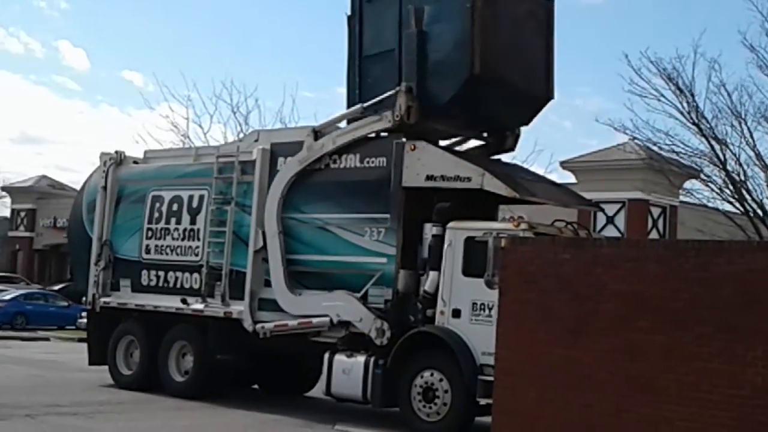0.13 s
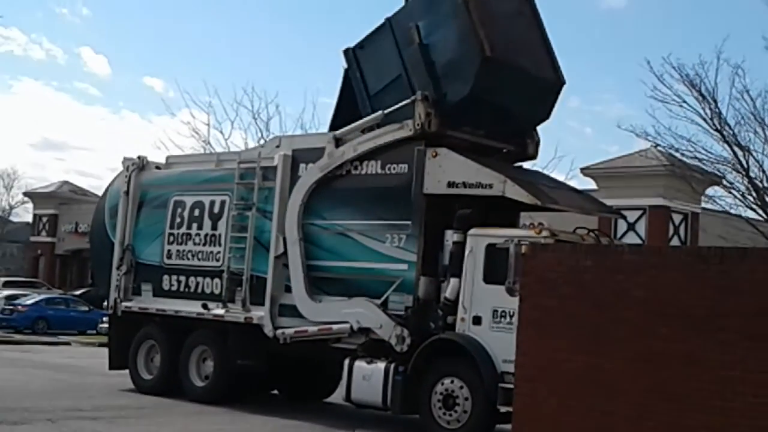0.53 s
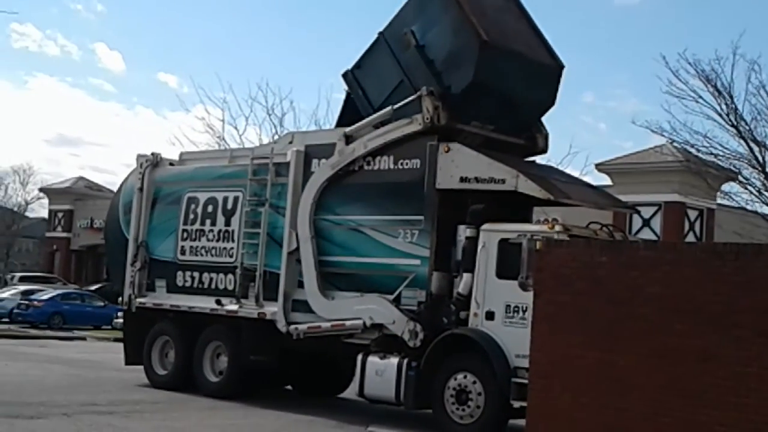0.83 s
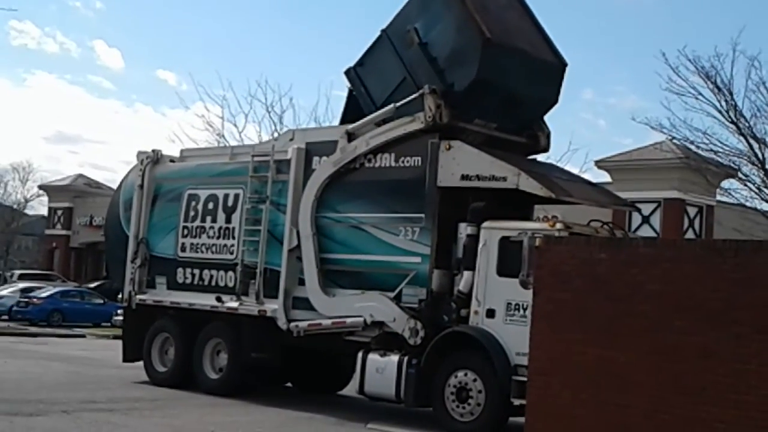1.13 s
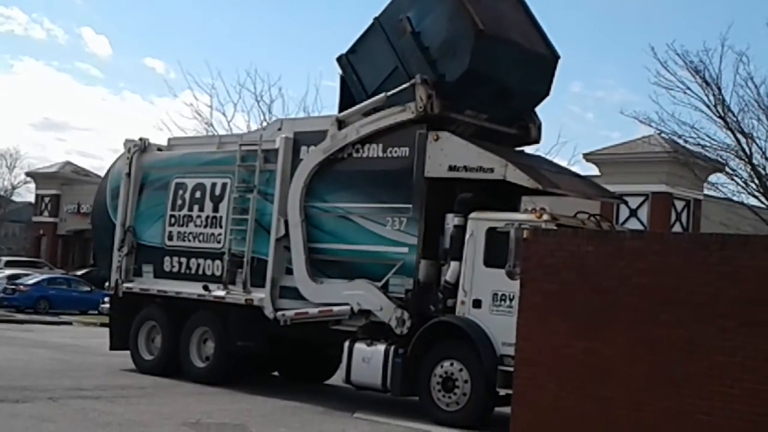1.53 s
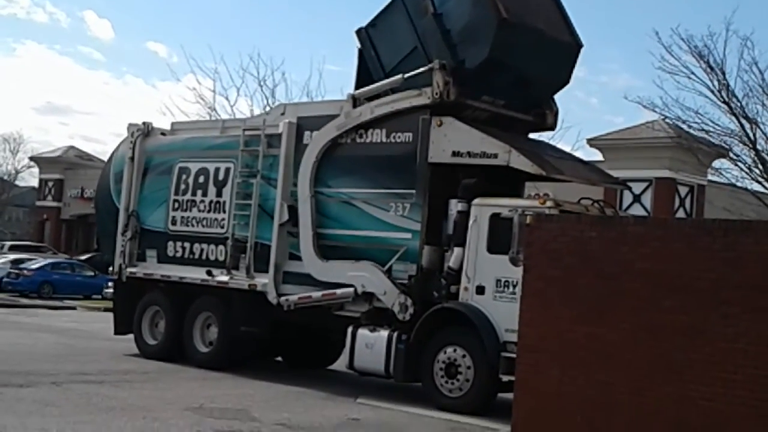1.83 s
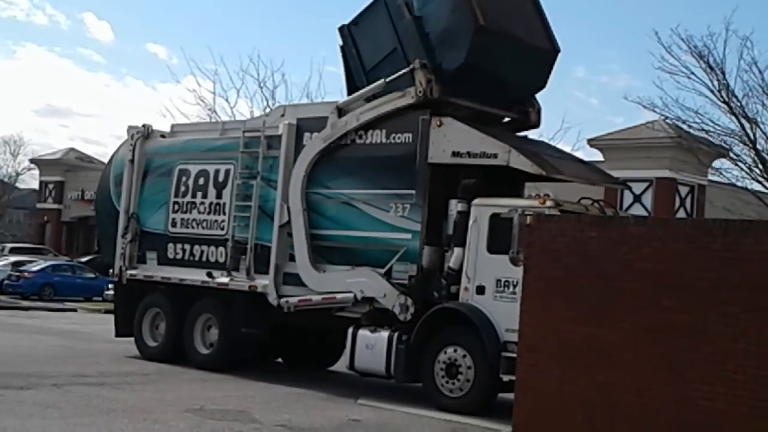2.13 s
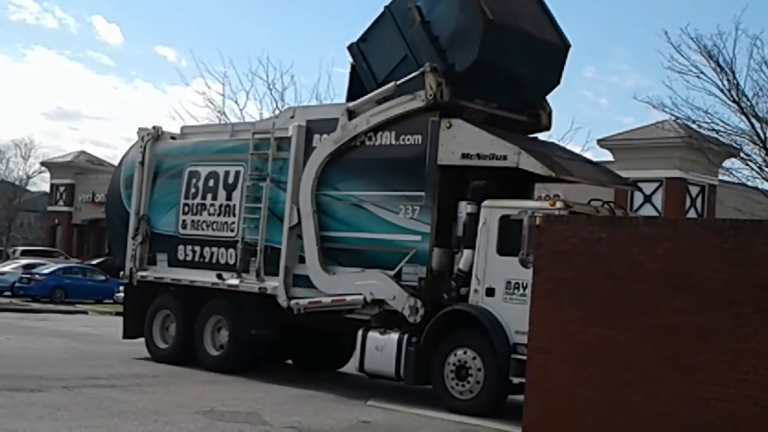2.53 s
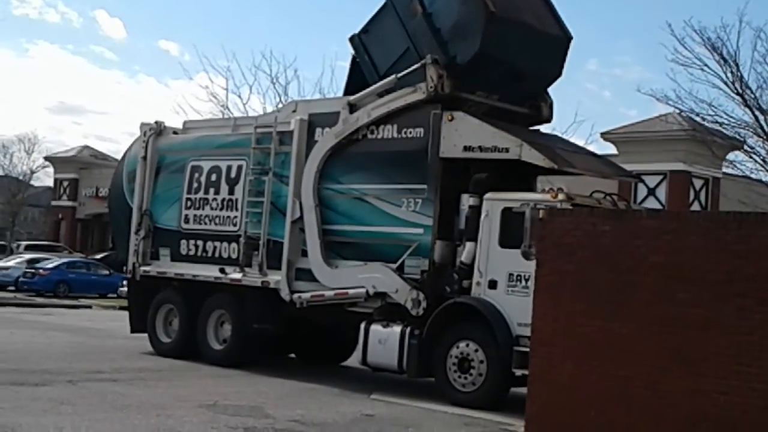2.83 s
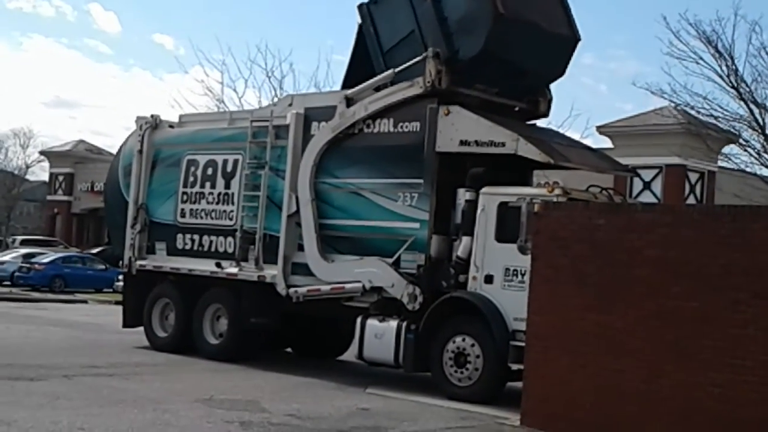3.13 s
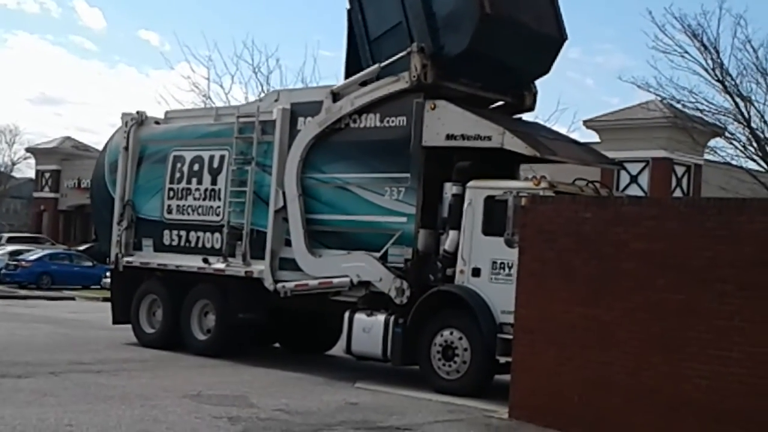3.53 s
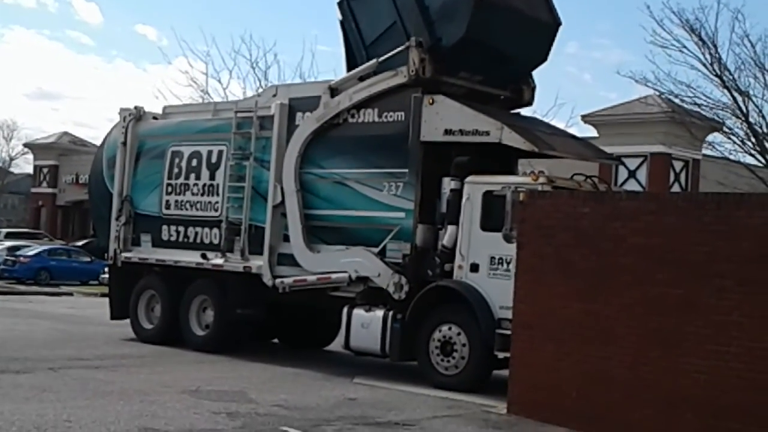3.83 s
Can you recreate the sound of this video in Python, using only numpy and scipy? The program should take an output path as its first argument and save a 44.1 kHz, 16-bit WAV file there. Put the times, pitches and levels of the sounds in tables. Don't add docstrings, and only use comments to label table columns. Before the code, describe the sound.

A big hollow metal container bangs and clatters on a truck's lifting arms, hydraulics humming

```python
import sys
import numpy as np
from scipy import signal
from scipy.fft import rfft, irfft, next_fast_len
from scipy.io import wavfile
from scipy.ndimage import uniform_filter1d, minimum_filter1d

SR = 44100
rng = np.random.default_rng(int(sys.argv[2]) if len(sys.argv) > 2 else 0)


def gain_from_db(level_db):
    decades = np.asarray(level_db, float) / 20
    return 10 ** decades


def transcribe(signal):
    frames = np.atleast_2d(signal).T
    limited = np.clip(frames, -1, 1)
    pcm = np.round(limited * 32767).astype(np.int16)
    wavfile.write(sys.argv[1], SR, pcm)


N = 176400

# (time [s], force [dB], contact hardness [dB])
RATTLES = [
    [(.21, -22, -58), (.3, -20, -56)],
    [(.29, -11, -47), (.37, -19.5, -34), (.48, -15.5, -28.5), (.62, -20, -38), (.8, -27, -48.5),
     (1.0, -32.5, -55), (1.25, -40, -60.5)],
    [(2.25, -22.5, -53), (2.32, -23.5, -58)],
    [(2.31, -16, -39), (2.37, -15.5, -38), (2.44, -14.5, -38), (2.53, -18, -35), (2.62, -16.5, -32.5),
     (2.8, -21.5, -39), (2.97, -28, -52), (3.45, -39.5, -50)],
    [(3.84, -18, -53.5), (3.87, -19, -48.5), (3.92, -18.5, -48.5), (4, -20, -50)],
]
# (time [s], peak [dB], hardness [dB])
SLAMS = [
    (0.204, -28, -14),
    (.288, -1.5, 0.5),
    (2.248, -26, -10),
    (2.308, -4.5, 4),
    (3.836, -16, -8),
    (2.487, -13.5, -14.5),
]
# (frequency [Hz], level [dB per Hz])
BOX_SPECTRUM = [(30, -50), (70, -15), (260, -4), (700, -4), (1600, -17), (3300, -28), (5500, -41.5),
                (11500, -55), (14000, -59)]
# (frequency [Hz], width [Hz], level [dB])
PANELS = [(263.4, 96, 5.5), (338, 52, 6.5), (434, 51, -6), (656, 164, 8), (820, 100, -4), (1007, 80, 2.5),
          (1396, 420, 4.5), (2090, 350, 3.5), (3180, 81, 4), (4400, 2030, 4)]
# (frequency [Hz], t60 [s])
BOX_DECAY = [(60, 0.5), (300, 0.15), (1000, 0.08), (4000, 0.12), (12000, .05)]
# (low edge [Hz], high edge [Hz], share of hardness swing [1], share of smooth sliding [1])
CONTACT_BANDS = [(20, 1300, 0.012, 0.2), (1300, 3500, 0.16, 0.39), (3500, 6500, 0.43, .45),
                 (6500, 16000, 0.88, 0.5)]
CRACK_SHARE = [0.4, .8, 0.6, 1.1]
# (frequency [Hz], level [dB], t60 [s])
BOOMS = [(103, -13, 0.27), (272, -15, 0.13), (344.5, -4.5, 0.69), (678, -16, 0.065)]
# (time [s], peak [dB], low walls [dB], high walls [dB])
BOUNCES = [(0.29, 2, -7, -13.5), (0.329, 3.5, -12, -7.5), (0.384, 2, -16, -8), (0.429, -7, -2.5, -15),
           (0.471, -6, -17, -9.5), (0.539, -1, -7, -16), (0.579, 0, -6.5, -6.5), (0.634, -3.5, -14, -6.5),
           (0.716, -10, -2.5, -12), (0.759, -9, -7, -8.5), (0.83, -12.5, -7.5, -18),
           (0.947, -14.5, -4, -10), (2.312, 5.5, -23, -7.5), (2.334, 0, -15, -5), (2.364, 1, -17, -8),
           (2.419, -8, -11, -4), (2.459, -8, -8, -5), (2.486, -0.5, -7, -12), (2.555, 2, -12.5, -11),
           (2.599, 0.5, -9.5, -10.5), (2.664, -11, -4, -17), (2.729, -5, -11, -4), (2.779, -4, -4.5, -7.5),
           (2.849, 1.5, -7.5, -15.5), (2.885, -12, -10, -17), (2.929, -16, -7, -5), (2.996, -11.5, -7, -11),
           (3.837, -9.5, 2, -19), (3.869, -5, -5.5, -11), (3.894, -5.5, -6, -10), (3.929, -9, -5, -6.5),
           (3.959, -5, 1, -14.5), (3.984, 2.5, -7.5, -10.5)]
# (frequency [Hz], level [dB], t60 [s])
LOW_WALLS = [(265.6, 0.5, 0.11), (302, -0.5, 0.09), (337, 1, 0.15), (372, -3, 0.11)]
# (frequency [Hz], level [dB], t60 [s])
HIGH_WALLS = [(565, -4, 0.12), (614, -3.5, 0.14), (651, 1.5, .11), (708, -3.5, 0.12)]
# (time [s], pump hum [dB], arm grind [dB])
LOAD = [(0, -19.5, -24.5), (.13, -23, -28), (.24, -27, -20), (.3, -37.5, -43), (1.2, -40.5, -46),
        (1.52, -36, -49.5), (1.75, -27, -33), (1.95, -23, -27), (2.17, -23.5, -21.5), (2.22, -24.5, -20.5),
        (2.27, -52, -21), (2.35, -63, -47), (3.4, -53, -53.5), (3.55, -36, -41), (3.77, -31.5, -38.5),
        (3.83, -35.5, -34), (4, -51, -29.5)]
# (time [s], frequency [Hz])
PUMP_HZ = [(0, 212), (.3, 211), (1.5, 214), (1.75, 206), (2.0, 212), (2.25, 202), (3.5, 214), (3.75, 209),
           (4, 209)]
# (multiple [1], level [dB])
PUMP_ORDERS = [(1, 0), (2, -18), (3, -17), (4, -21)]
# (frequency [Hz], level [dB per Hz])
GRIND_SPECTRUM = [(30, -36.5), (70, -9), (200, -13), (700, -18), (2500, -31.5), (3300, -39), (4900, -49),
                  (6400, -63), (7200, -77), (14000, -82)]
# (time [s], length [s], level [dB], lean to treble [dB per octave])
SQUEAKS = [
    (2.114, .08, -78, 2),
    (2.193, 0.077, -76, -2),
    (2.987, 0.15, -79, 8),
    (3.07, .18, -94, -16),
    (3.23, 0.15, -79.5, -8),
]
# (frequency [Hz], width [Hz], level [dB])
HINGE_MODES = [(7300, 150, 2), (8900, 600, 0), (9800, 1500, -1), (10800, 500, -3), (4200, 1100, 14)]
# (frequency [Hz], level [dB per Hz])
DIESEL_SPECTRUM = [(25, -35), (70, -5), (210, -2.5), (700, -11.5), (2500, -28), (3000, -41.5), (4600, -50),
                   (7000, -89.5), (14000, -97)]
# (delay [s], level [dB])
ECHOES = [(.045, -14), (0.085, -15.5), (.14, -21)]
EDGES = 22 * 2 ** np.arange(0, 9.5, 1 / 3)

KNOCKS_PER_S, KNOCK_SPREAD_DB, CLUMP_DB = 2000, 3.5, 1.5
SLAM_DB, CRASH_DB, CRASH_S = 25, -7.5, 0.033
BOUNCE_DB, BOUNCE_SPREAD_DB = -7, 2.5
PUMP_WOBBLE, PUMP_FLUTTER_DB = 0.00632, 1
WHINE_HZ, WHINE_DB = 11100, -73
GRIND_BRIGHTENS, GRIND_EDGE_HZ = 0.6, 3400
FIRING_HZ, THROB_DB, DIESEL_DB = 27.5, -1, -32
LIMIT_DB, AHEAD_S, RECOVER_DB_PER_S = -0.9, 0.008, 250
MIC_LOW_HZ, CUTOFF_HZ, HISS_DB = 40, 12500, -96


def rms_one(x):
    return x / np.sqrt(np.mean(x ** 2) + 1e-20)


def in_time(rows):
    s, *columns = np.transpose(rows)
    return [np.interp(np.arange(N) / SR, s, c) for c in columns]


def at_hz(points, hz):
    table = np.array(points)
    return np.interp(np.log(hz), np.log(table[:, 0]), table[:, 1])


def panels_db(hz):
    return sum(db / (1 + (2 * (hz - centre) / width) ** 2) for centre, width, db in PANELS)


def drift(rate):
    r = np.exp(-80 * np.pi * rate / SR)
    white = rng.standard_normal(N // 40 + 2002)
    slow = signal.lfilter([1], [1, -2 * r, r * r], white)[2000:]
    return np.interp(np.arange(N) / 40, np.arange(len(slow)), rms_one(slow))


def band(x, low, high):
    return signal.sosfilt(signal.butter(2, [low, high], "band", fs=SR, output="sos"), x)


def damped_mode(hits, hz, t60):
    r, w = gain_from_db(-60 / (t60 * SR)), 2 * np.pi * hz / SR
    return signal.lfilter([0, np.sin(w)], [1, -2 * r * np.cos(w), r * r], hits + 1e-18)


def rumble(spectrum, patchy_db, panel_share):
    white, together = rng.standard_normal((2, N)), drift(5)
    out = np.zeros(N)
    for k, (low, high) in enumerate(zip(EDGES, EDGES[1:])):
        flicker = gain_from_db(patchy_db * (0.39 * together + drift(7.5)))
        out += flicker * band(white[k % 2], low, high)
    hz = np.fft.rfftfreq(N, 1 / SR) + 1
    colour_db = at_hz(spectrum, hz) + panel_share * panels_db(hz)
    return rms_one(irfft(rfft(out) * gain_from_db(colour_db), N))


def container(spots=6):
    t = np.arange(N) / SR
    force, hard = np.zeros(N), np.zeros(N)
    for rows, (start, *_) in zip(RATTLES, SLAMS):
        force_db, hard_db = in_time(rows)
        on = (t >= start) * np.clip(1 - (t - rows[-1][0]) / 0.11, 0, 1)
        force += on * gain_from_db(force_db)
        hard = np.where(t >= start, hard_db + 40.5, hard)

    sizes = gain_from_db(KNOCK_SPREAD_DB * np.minimum(rng.exponential(1, N), 5)) * rng.choice([-1, 1], N)
    knocks = rms_one(sizes * (rng.random(N) < KNOCKS_PER_S / SR)) * gain_from_db(CLUMP_DB * drift(25))
    sliding = rng.standard_normal(N)

    slams, crack = np.zeros(N), np.zeros(N)
    for s, db, hard_db in SLAMS:
        slams[int(s * SR)] = gain_from_db(db)
        crack[int(s * SR):int((s + 5 * CRASH_S) * SR)] = hard_db
    burst = signal.lfilter([1], [1, -np.exp(-1 / (CRASH_S * SR))], slams + 1e-18)
    crash = gain_from_db(SLAM_DB) * slams + gain_from_db(CRASH_DB) * sliding * burst

    at_spot = rng.integers(0, spots, N) == np.arange(spots)[:, None]
    white, age = rng.standard_normal((2, spots, SR // 3)), np.arange(SR // 3) / SR
    size, spectrum = next_fast_len(N + SR // 2), 0
    for (low, high, share, smooth), bite in zip(CONTACT_BANDS, CRACK_SHARE):
        rings = 0
        for k, (a, b) in enumerate(zip(EDGES, EDGES[1:])):
            if low <= a < high:
                t60 = max(at_hz(BOX_DECAY, a), 0.02)
                rings = rings + band(white[k % 2] * gain_from_db(-60 * age / t60), a, b) / np.sqrt(t60)
        rattle = force * (np.sqrt(1 - smooth) * knocks + np.sqrt(smooth) * sliding)
        blows = (rattle + gain_from_db(bite * crack) * crash) * gain_from_db(share * hard) * at_spot
        spectrum = spectrum + np.sum(rfft(rings, size) * rfft(blows, size), axis=0)

    hz = np.fft.rfftfreq(size, 1 / SR) + 1
    ringing = irfft(spectrum * gain_from_db(at_hz(BOX_SPECTRUM, hz) + panels_db(hz)), size)[:N]
    thump = sum(gain_from_db(db) * damped_mode(slams, boom_hz, t60) for boom_hz, db, t60 in BOOMS)
    return gain_from_db(-18) * ringing + thump


def bounces():
    s, db, low_db, high_db = np.transpose(BOUNCES)
    luck, out = rng.standard_normal((len(s), 16)), 0
    for k, (hz, mode_db, t60) in enumerate([*LOW_WALLS, *HIGH_WALLS]):
        cluster_db = low_db if k < len(LOW_WALLS) else high_db
        strike_db = BOUNCE_DB + db + cluster_db + mode_db + BOUNCE_SPREAD_DB * luck[:, k]
        hits = np.zeros(N)
        hits[(s * SR).astype(int)] = gain_from_db(strike_db) * np.sign(luck[:, -1 - k])
        out = out + damped_mode(hits, hz, t60)
    return band(out, 190, 900)


def hydraulics():
    hum_db, grind_db = in_time(LOAD)
    pump_hz = in_time(PUMP_HZ)[0] * (1 + PUMP_WOBBLE * drift(11.7))
    phase = 2 * np.pi * np.cumsum(pump_hz) / SR
    hum = sum(gain_from_db(db + PUMP_FLUTTER_DB * drift(10)) * np.sin(k * phase) for k, db in PUMP_ORDERS)
    whine = rms_one(band(rng.standard_normal(N), WHINE_HZ - 60, WHINE_HZ + 60))
    hum += gain_from_db(WHINE_DB + 1.2 * (grind_db + 23.5) + 2.5 * drift(20)) * whine
    grind = rumble(GRIND_SPECTRUM, patchy_db=0.0, panel_share=0.93)
    brighter = gain_from_db(GRIND_BRIGHTENS * (grind_db + 25.0)) - 1
    grind = grind + brighter * band(grind, GRIND_EDGE_HZ, 15000)
    return np.sqrt(2) * gain_from_db(hum_db) * hum + gain_from_db(grind_db) * grind


def hinge():
    t, white, out = np.arange(N) / SR, rng.standard_normal(N), 0
    for hz, width, level_db in HINGE_MODES:
        on = 0
        for s, length, db, lean_db in SQUEAKS:
            tilt_db = lean_db * (hz > 6000) * np.log2(hz / 9000)
            fade = np.clip(np.minimum(t - s, s + length - t) / 0.037, 0, 1)
            on = on + gain_from_db(db + tilt_db) * fade
        slips = rms_one(band(white, hz - width / 2, hz + width / 2))
        out = out + on * gain_from_db(level_db + 2.5 * drift(14)) * slips
    return out


def diesel():
    throb = np.sin(2 * np.pi * np.cumsum(FIRING_HZ * (1 + 0.022 * drift(3.4))) / SR)
    return gain_from_db(DIESEL_DB + THROB_DB * throb) * rumble(DIESEL_SPECTRUM, patchy_db=1.23, panel_share=0.93)


def scene():
    x = container() + bounces() + hydraulics() + hinge() + diesel()
    dull = signal.lfilter([0.3], [1, -0.7], x)
    echoes = sum(gain_from_db(db) * np.pad(dull, (int(s * SR), 0))[:N] for s, db in ECHOES)
    return (x + echoes)[None]


def top_cut(x):
    return signal.sosfilt(signal.butter(12, 13770, fs=SR, output="sos"), x)


def record(dry):
    ahead = max(int(AHEAD_S * SR), 2)
    fall = RECOVER_DB_PER_S * np.arange(N) / SR
    over = np.maximum(20 * np.log10(np.abs(dry[0]) + 1e-9) - LIMIT_DB, 0)
    held = np.maximum.accumulate(over + fall) - fall
    held = uniform_filter1d(-minimum_filter1d(-held, 2 * ahead), ahead)
    x = signal.sosfilt(signal.butter(2, MIC_LOW_HZ, "high", fs=SR, output="sos"), dry * gain_from_db(-held))
    x = signal.sosfilt(signal.butter(8, CUTOFF_HZ, fs=SR, output="sos"), x)
    mix = x + gain_from_db(HISS_DB) * rng.standard_normal(N)
    return top_cut(mix)


dry = scene()
out = record(dry)
transcribe(out)
```